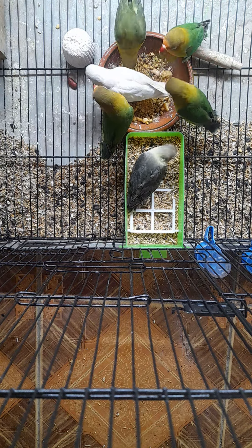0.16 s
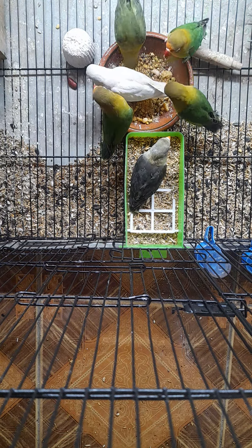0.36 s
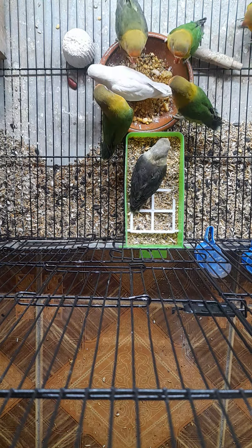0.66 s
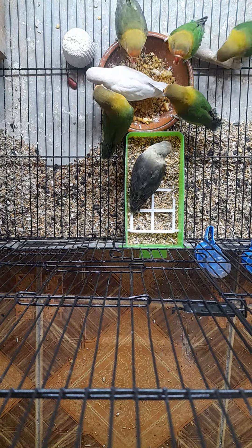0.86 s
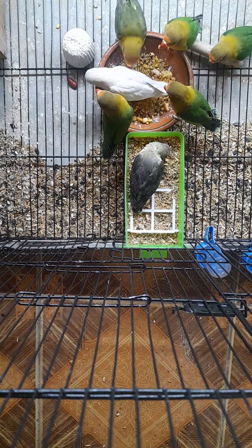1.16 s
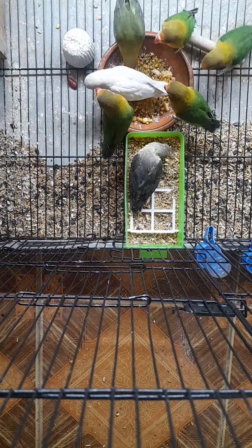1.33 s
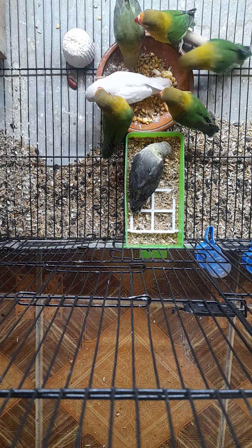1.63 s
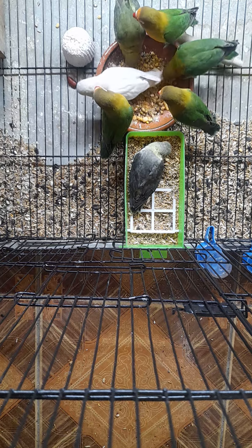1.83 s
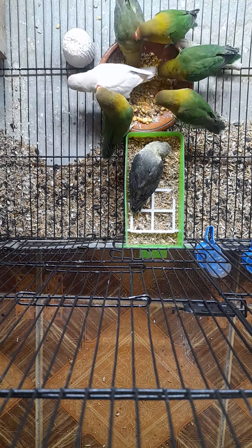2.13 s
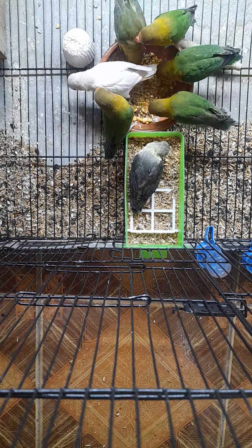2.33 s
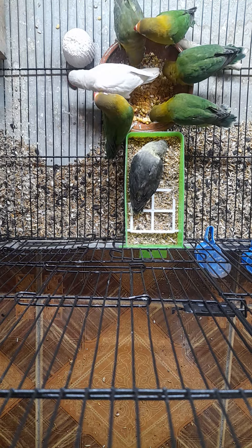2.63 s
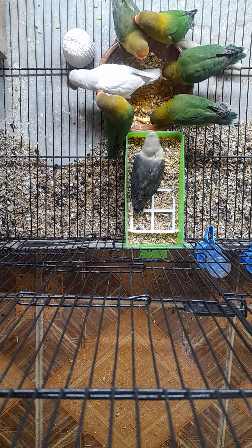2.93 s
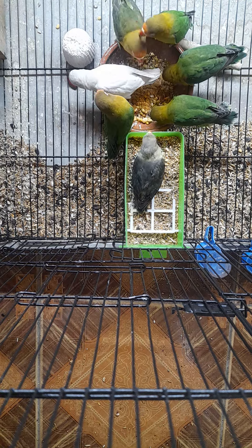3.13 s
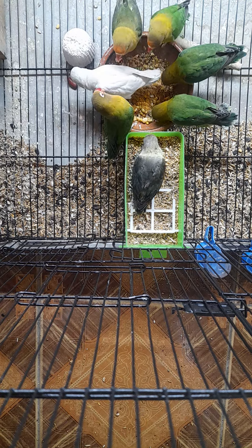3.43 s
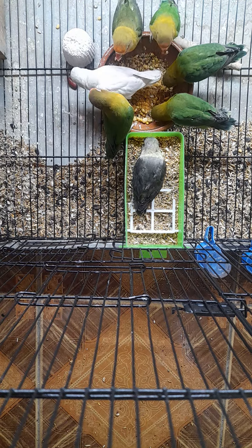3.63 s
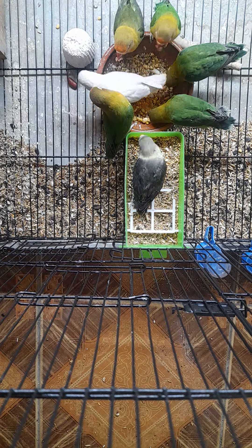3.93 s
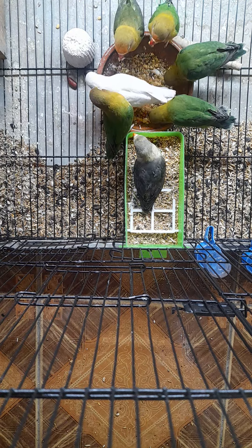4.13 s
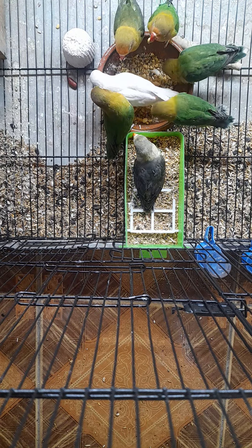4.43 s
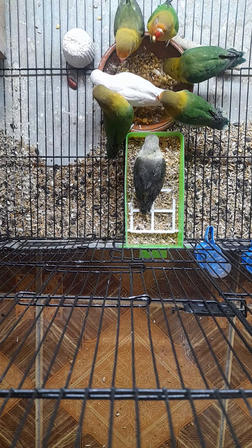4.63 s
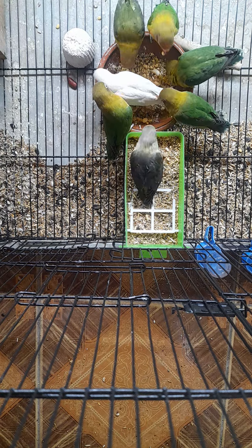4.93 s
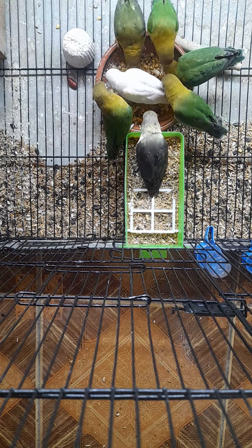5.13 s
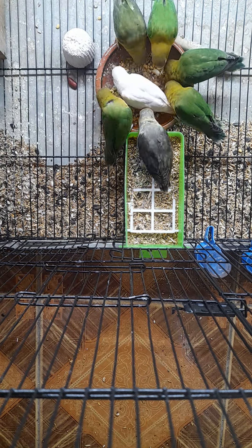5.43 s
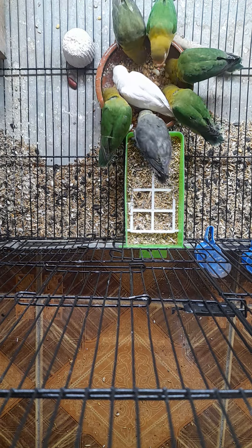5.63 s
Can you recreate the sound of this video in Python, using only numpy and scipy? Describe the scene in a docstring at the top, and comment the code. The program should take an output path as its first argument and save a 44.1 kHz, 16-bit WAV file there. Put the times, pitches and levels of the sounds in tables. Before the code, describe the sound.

Lovebirds at a seed dish in a cage. A clipped chirp opens, then a few grainy wing flicks with snaps. Sparse, softer peeps follow until a dense, loud volley of shrieks and whistled notes just before three seconds. Quiet chirps and warbles come next, then another raspy cluster near the end. Hard, reverberant room with low hum and airy rush; stereo microphone, birds to the right.

```python
"""A wire cage in a hard-walled room: lovebirds crowd round a seed dish, towards the right.
Shrieks, notes and warbles are gliding harmonic tones, throbbed and jittered into a rasp.
Wing flicks are grainy noise strokes with snaps among them; seed pecks and husk cracks are noise clicks.
Behind: a motor hum of steady lines, a rush of air, soft bumps, and at first a faint wavering far whistle."""
import sys
import numpy as np
from scipy import signal
from scipy.fft import rfft, irfft, next_fast_len
from scipy.io import wavfile
from scipy.ndimage import map_coordinates

SR = 44100
rng = np.random.default_rng(int(sys.argv[2]) if len(sys.argv) > 2 else 0)


def dump_mix(stems):
    """Bounce the given channels to the path in sys.argv[1] as a 16-bit WAV at rate SR."""
    frames = np.atleast_2d(stems).T  # one column per channel
    limited = np.clip(frames, -1, 1)  # hard clip at full scale
    pcm = np.round(limited * 32767).astype(np.int16)
    wavfile.write(sys.argv[1], SR, pcm)


N = 254456
TIME = np.arange(N) / SR   # s
PROGRESS = np.linspace(0, 1, 60)   # course of one syllable


def from_db(db):
    """Decibels to gain."""
    return 10 ** (np.asarray(db) / 20)


def rms_one(x):
    """Scale to rms 1."""
    return x / np.sqrt(np.mean(x ** 2) + 1e-20)


def at_hz(points, hz):
    """Interpolate (Hz, value) points on a log-frequency axis."""
    known_hz, values = np.transpose(points)
    return np.interp(np.log(np.maximum(hz, 1)), np.log(known_hz), values)


def colour(x, spectrum):
    """Filter by a smooth (Hz, dB) curve."""
    n = x.shape[-1]
    size = next_fast_len(n + 512)
    gain = from_db(at_hz(spectrum, np.fft.rfftfreq(size, 1 / SR)))
    return irfft(rfft(x, size) * gain, size)[..., :n]


def band(x, low_hz, high_hz):
    """Butterworth band-pass."""
    edges_hz = [low_hz, min(high_hz, SR / 2 - 100)]
    return signal.sosfilt(signal.butter(2, edges_hz, "band", fs=SR, output="sos"), x)


def high_pass(x, cutoff_hz):
    """Butterworth high-pass."""
    return signal.sosfilt(signal.butter(2, cutoff_hz, "high", fs=SR, output="sos"), x)


def drift(rate_hz, size):
    """Smooth random motion of spread about 1: a cubic spline through random knots."""
    knots_per_s = 2 * rate_hz
    knots = rng.standard_normal(int(size / SR * knots_per_s) + 6)
    return map_coordinates(knots, [2 + np.arange(size) / SR * knots_per_s], order=3)


def arch(start_s, length_s):
    """Half-sine swell."""
    return np.sin(np.pi * np.clip((TIME - start_s) / length_s, 0, 1))


def add(track, start_s, sound):
    """Mix a sound into a track."""
    start = max(round(start_s * SR), 0)
    part = sound[:max(N - start, 0)]
    track[start:start + len(part)] += part


def syllable(contour, overtone_db, step_db, throb_db=3.5, throb_hz=145, swing=0.12):
    """The syrinx whistles a gliding tone; when forced, it throbs unevenly and shakes into a rasp."""
    edge_s, bloom_s = 0.003, 0.003
    jitter, jitter_hz = 0.06, 500   # jitter, swing: log-pitch depth at full rasp
    hiss_db, hiss_low_hz, hiss_high_hz = -13, 2400, 6500
    knot_s, knot_hz, knot_db, knot_rasp = np.transpose(contour)
    t = np.arange(knot_s[0], knot_s[-1] + edge_s, 1 / SR)
    rasp = np.clip(np.interp(t, knot_s, knot_rasp), 0.03, 1)

    # pitch sweeps down through each burst of strength
    throb = 2 * np.pi * throb_hz * t + drift(throb_hz / 3, len(t))
    shake = -swing * np.sin(throb) + jitter * drift(jitter_hz, len(t))
    pitch_hz = np.interp(t, knot_s, knot_hz) * np.exp(rasp * shake)
    bursts = rms_one(from_db(throb_db * np.sqrt(rasp) * np.cos(throb)))
    strength = bursts * from_db(np.interp(t, knot_s, knot_db))

    # harmonics build up just after the onset; those above Nyquist are muted
    phase = 2 * np.pi * np.cumsum(pitch_hz) / SR
    tone = np.sin(phase)
    bloom = 1 - np.exp(-(t - t[0]) / bloom_s)
    for k in range(2, 8):
        gain = from_db(overtone_db + min(step_db, -1) * (k - 2.5))
        tone += bloom * gain * np.sin(k * phase) * (k * pitch_hz < SR / 2)

    # forced air tears into hiss that fills the gaps between harmonics
    hiss = rms_one(band(rng.standard_normal(len(t)), hiss_low_hz, hiss_high_hz))
    tone += from_db(hiss_db) * rasp * hiss
    edges = np.clip(np.minimum(t - t[0], t[-1] - t) / edge_s, 0, 1)
    return np.sqrt(2) * tone * strength * edges


def gesture(length_s, pitch_hz, level_db, rasp):
    """Course of one syllable as rows of (s, pitch Hz, level dB, rasp 0-1)."""
    return np.column_stack(np.broadcast_arrays(length_s * PROGRESS, pitch_hz, level_db, rasp))


def shriek(length_s, foot_hz, top_hz, level_db, rasp, overtone_db, step_db, point):
    """Pitch scoops in, then rises and falls with effort; deep throbs chop it into quick down-strokes."""
    skew = 0.98   # under 1: top comes before the middle
    scoop, scoop_s = 0.2526, 0.0023   # starting shortfall as a share of pitch, catch-up time
    tire_db = 8   # lost from start to end
    effort = np.abs(np.sin(np.pi * PROGRESS ** skew)) ** point
    scooped = 1 - scoop * np.exp(-length_s * PROGRESS / scoop_s)
    pitch_hz = (foot_hz + (top_hz - foot_hz) * effort) * scooped
    db = level_db - tire_db * (PROGRESS - 0.5)
    contour = gesture(length_s, pitch_hz, db, rasp)
    return syllable(contour, overtone_db, step_db, throb_db=7, throb_hz=150.9, swing=0.19)


def note(length_s, start_hz, end_hz, level_db, rasp, overtone_db, step_db):
    """A peep that starts rough, then clears and sags as it glides evenly."""
    sag_db = 4   # lost from start to end
    swell_db, swell_s = 2, 0.0047   # quieter start, recovery time
    clearing_nepers = 0.7   # rasp decay over the note
    pitch_hz = start_hz + (end_hz - start_hz) * PROGRESS
    db = level_db - sag_db * PROGRESS - swell_db * np.exp(-length_s * PROGRESS / swell_s)
    clearing_rasp = rasp * np.exp(clearing_nepers * (0.5 - PROGRESS))
    return syllable(gesture(length_s, pitch_hz, db, clearing_rasp), overtone_db, step_db)


def stroke(length_s, held_hz, level_db, offset, plunge_s):
    """A nearly pure tone that slides onto its pitch, hangs, then plunges and rests on a low foot."""
    foot_hz, foot_db, rest_s = 1590, 1, 0.004   # foot_db: gain on the foot
    settle_s, rasp = 0.0038, 0.2
    t = length_s * PROGRESS
    fall = np.clip(1 + (t - length_s + rest_s) / plunge_s, 0, 1)
    slide = 1 + offset * np.exp(-t / settle_s)
    pitch_hz = (held_hz + (foot_hz - held_hz) * fall) * slide
    contour = gesture(length_s, pitch_hz, level_db + foot_db * fall, rasp)
    return syllable(contour, overtone_db=-21, step_db=-2)


def calls(call, table):
    """Every row of a table, sung at its time."""
    out = np.zeros(N)
    for start_s, *row in table:
        add(out, start_s, call(*row))
    return out


def birds():
    """All shrieks and notes, coloured by throat and beak."""
    # overtone_db: harmonic level extrapolated to order 2.5
    # step_db: per further harmonic, held to -1 or less
    # arching shrieks: start_s, length_s, foot_hz, top_hz, level_db (midway), rasp (0-1),
    # overtone_db, step_db, point (exponent: under 1 flat-topped, over 1 pointed)
    shriek_rows = [(0, 0.0079, 4460, 6430, -15.5, 0.3, -27, -23, 0.7),
                   (2.681, 0.073, 3900, 5780, -11, 0.52, -13.5, -1, 1.84),
                   (2.98, 0.025, 4380, 7290, -16, 0.18, -8, -1.5, 1.03),
                   (3.066, 0.052, 4050, 5580, -19, 0.64, -16, -7.5, 0.72),
                   (3.131, 0.037, 3510, 5560, -16.5, 0.67, -15, -1.5, 1.1),
                   (5.201, 0.021, 4120, 6180, -14, 0.31, -21.5, -19, 0.71),
                   (5.273, 0.021, 3640, 5360, -13, 0.26, -18, -10, 0.48),
                   (5.638, 0.03, 5430, 6195, -13.5, 0.2, -22, -19, 0.86)]
    # gliding notes: start_s, length_s, start_hz, end_hz, level_db (before swell and sag),
    # rasp (0-1, midway), overtone_db, step_db
    note_rows = [(0, 0.024, 3895, 3897, -11.5, 1, -16, -1),
                 (0.024, 0.013, 4050, 3804, -10.5, 0.07, -13, -1),
                 (0.035, 0.0089, 3800, 2920, -19.5, 0.55, 0, -4.5),
                 (0.045, 0.0098, 3890, 4004, -10.5, 0.13, -6.5, -1),
                 (1.214, 0.0628, 3582, 3490, -25.5, 0.48, -4, -8),
                 (1.249, 0.046, 5800, 4794, -22.5, 0.79, -7.5, -1),
                 (1.299, 0.046, 4667, 4450, -20.5, 0.35, -9, -7.5),
                 (2.058, 0.012, 2210, 2325, -34.5, 0.84, -5.5, -1.5),
                 (2.137, 0.034, 2687, 2448, -28, 0.78, -2.5, -3.5),
                 (2.155, 0.032, 5036, 4845, -23, 0.47, -5, -0.5),
                 (2.497, 0.013, 2030, 1968, -25, 0.47, -1.5, -1),
                 (2.503, 0.0086, 4990, 6190, -15.5, 0.6, -21, -3),
                 (2.513, 0.029, 6230, 6600, -20.5, 0.2, -10.5, 1),
                 (2.666, 0.02, 2616, 2664, -20.5, 0.8, -1, -1),
                 (2.77, 0.015, 4370, 2680, -16.5, 0.53, -22, 3),
                 (2.787, 0.03, 2190, 2313, -27, 0.08, -2, -1),
                 (2.793, 0.035, 3530, 4135, -16.5, 0.18, -12, -1),
                 (2.824, 0.019, 4230, 4186, -4.5, 0.03, -15, -1),
                 (2.939, 0.027, 2330, 2674, -27, 0.45, 1.5, -4.5),
                 (2.959, 0.0088, 2550, 2904, -14, 0, -2.5, -4), (2.972, 0.0084, 3326, 4500, -6, 0, -6.5, 4),
                 (3.007, 0.014, 3585, 2420, -16.5, 0.6, -14, -1),
                 (3.033, 0.015, 3738, 3926, -6, .08, -15, 0), (3.047, 0.013, 3034, 3153, -12, 0.14, -7, -4),
                 (3.06, 0.013, 4170, 4360, -4.5, 0.25, -19, 3),
                 (3.678, 0.037, 3266, 3400, -38.5, 0.43, -17, -1),
                 (3.782, 0.043, 2070, 1950, -41, 0.35, -21, -1.5),
                 (3.882, 0.025, 2422, 2512, -47.5, 0.22, -3, -5.5),
                 (4.564, 0.04, 2031, 1985, -34.5, 0.42, -9.5, -3.5),
                 (4.604, 0.019, 2390, 2747, -33, 0.98, -2, -5),
                 (4.631, 0.03, 3236, 2956, -36.5, 0.76, -6.5, -6),
                 (4.921, 0.04, 3510, 3080, -35.5, 0.53, -22, 0),
                 (5.183, 0.014, 3090, 2262, -22.5, 1, -1.5, -5.5),
                 (5.225, 0.027, 3118, 3167, -18, 0.39, -1, -8),
                 (5.259, 0.017, 3617, 3683, -13.5, 0.6, -8, -7),
                 (5.383, 0.025, 2280, 2367, -23.5, 0, -8, 2), (5.405, 0.04, 2395, 2700, -29.5, 0.42, 2, 12),
                 (5.446, 0.032, 2730, 2880, -23.5, 0.17, -8, -1),
                 (5.477, 0.021, 4360, 4364, -22.5, 0.09, -2, 14),
                 (5.498, 0.039, 3735, 3595, -25, 0.8, -11.5, -5),
                 (5.611, 0.017, 3790, 4510, -21, 0.8, -15, -10),
                 (5.623, 0.025, 4515, 4826, -8, 0.09, -27, -3)]
    # throat and beak response: freq_hz, gain_db
    beak = [(1500, -7.5), (2200, -4.5), (6300, -5.5), (7900, -4.5), (8900, -10.5), (10000, 1.5),
            (11000, -5.5), (12700, -3), (15000, -18.5)]
    return colour(calls(shriek, shriek_rows) + calls(note, note_rows), beak)


def warbles():
    """Runs of strokes that slide onto a pitch, hold it, then plunge."""
    # strokes: start_s, length_s, held_hz, level_db (before the foot),
    # offset (at the start, share of pitch), plunge_s
    stroke_rows = [(1.569, 0.019, 2750, -33, 0.16, 0.0014), (1.588, 0.04, 3500, -31, -0.0018, 0.013),
                   (1.636, 0.036, 2840, -31.5, -0.25, 0.009), (3.702, 0.041, 2640, -43.5, 0.63, 0.0034),
                   (3.766, 0.037, 2463, -44.5, 0.083, 0.0104), (4.884, 0.041, 2500, -41.5, 0.87, 0.003),
                   (4.95, 0.025, 2450, -32.5, 0.65, 0.0035)]
    return calls(stroke, stroke_rows)


def wings():
    """Feathers brush past each other in short, grainy strokes."""
    # wing flicks: start_s, level_db (arch peak), length_s
    flicks = [(0.178, -31, 0.048), (0.303, -29, 0.073), (0.415, -37, 0.032), (0.455, -33.5, 0.055),
              (1.898, -47.5, 0.017)]
    # feather noise spectrum: freq_hz, density_db (relative)
    feathers = [(710, -36), (1200, -30), (1330, -9.5), (3600, -2), (4220, -2), (7310, -1), (13400, -17.5),
                (15000, -24)]
    grain_db, grain_hz = 5.0, 130
    strokes = sum(from_db(db) * arch(start_s, length_s) for start_s, db, length_s in flicks)
    grain = from_db(grain_db * drift(grain_hz, N))
    return strokes * rms_one(colour(rng.standard_normal(N), feathers) * grain)


def clicks():
    """Decaying noise clicks: feather snaps, two beak pecks and many tiny cracks of seed husks."""
    # short clicks, feather snaps among the wing flicks, then two beak pecks:
    # start_s, level_db (onset, before band-pass)
    click_rows = [(0.1935, -25), (0.331, -23), (0.4696, -25), (0.852, -42.5), (1.9894, -37)]
    decay_s, low_hz, high_hz = 0.0023, 1200, 11000
    husk_db, husk_range_db, husk_count = -52, 10, 30
    out, t = np.zeros(N), TIME[:SR // 30]
    husks = [(u * N / SR, husk_db + husk_range_db * (v - 0.5)) for u, v in rng.random((husk_count, 2))]
    for start_s, db in click_rows + husks:
        add(out, start_s, from_db(db) * np.exp(-t / decay_s) * rng.standard_normal(len(t)))
    return band(out + 1e-18, low_hz, high_hz)


def bumps():
    """Soft, dull knocks and rumbles of band noise, a little different in each ear."""
    # bumps: start_s, level_db (arch peak), length_s, centre_hz
    bump_rows = [(0.346, -44.5, 0.26, 342), (1.863, -42, 0.19, 330), (4.353, -46, 0.13, 58),
                 (4.547, -41, 0.0096, 800), (4.565, -52, 0.22, 61), (5.155, -40, 0.34, 81)]
    spread, apart = 2.28, 0.6   # band edge ratio to centre, independent noise per ear
    noise = rng.standard_normal(N) + apart * rng.standard_normal((2, N))
    return sum(from_db(db) * arch(start_s, length_s) * rms_one(band(noise, hz / spread, hz * spread))
               for start_s, db, length_s, hz in bump_rows)


def room(x, early_db=-1.5, tail_db=-0.5, gap_s=0.0043, thin_hz=1500):
    """Direct sound, floor and near-wall echoes, then a diffuse tail, thin in lows, shorter in treble."""
    # reverberation time: freq_hz, t60_s
    t60 = [(1500, 0.51), (5000, 0.41), (14000, 0.24)]
    early_decay_s, echoes_per_s = 0.018, 900
    t = TIME[:int(0.7 * SR)]
    edges_hz = np.geomspace(500, 20000, 8)
    white = rng.standard_normal((2, len(t)))
    tail = np.zeros((2, len(t)))
    for k, (low_hz, high_hz) in enumerate(zip(edges_hz, edges_hz[1:])):
        decay = from_db(-60 * t / at_hz(t60, np.sqrt(low_hz * high_hz)))
        tail += band(white, low_hz, high_hz) * decay * (-1) ** k
    tail *= t > gap_s
    hits = rng.random((2, len(t))) < echoes_per_s / SR
    early = rng.standard_normal((2, len(t))) * hits * np.exp(-t / early_decay_s) * (t > gap_s / 2)
    response = (from_db(tail_db) * rms_one(tail) + from_db(early_db) * rms_one(early)) / np.sqrt(len(t))
    response = high_pass(response, thin_hz)
    response[:, 0] += 1   # direct sound
    return signal.fftconvolve(x[None], response, axes=1)[:, :N]


def far_whistle():
    """A narrow tone, blurred by its long way through the room."""
    # whistle course: time_s, pitch_hz, level_db; silent after the last row
    course = [(0, 1246, -57), (.93, 1220, -55), (1.15, 1205, -60), (1.38, 1215, -47), (1.55, 1170, -59),
              (2.253, 1220, -60), (2.479, 1245, -48.5), (2.8, 1200, -58.5)]
    blur_hz = 22
    knot_s, knot_hz, knot_db = np.transpose(course)
    phase = 2 * np.pi * np.cumsum(np.interp(TIME, knot_s, knot_hz)) / SR
    blurred = [drift(blur_hz, N) * np.cos(phase) + drift(blur_hz, N) * np.sin(phase) for _ in range(2)]
    return np.array(blurred) * from_db(np.interp(TIME, knot_s, knot_db, right=-120))


def motor():
    """Steady hum lines that wander slightly in phase."""
    # hum lines: freq_hz, level_db (before background gain), lean_db (right minus left)
    lines = [(57.3, -63.5, 6), (75.5, -52.5, -0.5), (231.8, -62.5, -5.5), (254.5, -65, -3),
             (519.2, -59.5, -0.5), (634, -65, -6.5)]
    wander_rad, wander_hz = 0.11, 5.1
    out = np.zeros((2, N))
    for hz, db, lean_db in lines:
        gain = np.sqrt(2) * from_db(db + np.array([[-0.5], [0.5]]) * lean_db)
        out += gain * np.sin(2 * np.pi * hz * TIME + wander_rad * drift(wander_hz, N))
    return out


def air():
    """Room rush of coloured noise, alike in both ears in the bass only."""
    # rush spectrum: freq_hz, gain_db (relative)
    rush = [(18, -55), (30, -22.5), (81, -3), (110, -10), (300, -4.5), (400, -11.5), (524, -9),
            (1060, -19.5), (1200, -18), (1410, -22.5), (2130, -24.5), (5170, -30.5), (15000, -38.5)]
    # correlation between ears: freq_hz, likeness (0-1)
    likeness = [(80, 0.92), (200, 0.3), (4000, 0.027)]
    level_db = -49.0   # before background gain
    alike = np.clip(at_hz(likeness, np.fft.rfftfreq(N, 1 / SR)), 0, 1)
    mid, side = rfft(rng.standard_normal((2, N)))
    pair = irfft(np.sqrt(1 + alike) * mid + np.sqrt(1 - alike) * side * [[1], [-1]], N)
    return from_db(level_db) * rms_one(colour(pair, rush))


def scene():
    """The cage in its room over the background; left microphone shaded, right one lagging slightly."""
    # left microphone shaded from the cage: freq_hz, gain_db
    left_shade = [(1500, -11), (3000, -8), (4500, -11.5), (6500, -19), (8800, -31), (10700, -25.5),
                  (11600, -13.5), (13000, -10), (14200, -4)]
    # recorder gain on the background, a preset curve: sinks after loud shrieks, later recovers:
    # time_s, gain_db
    gain_points = [(0, 2.5), (1.15, 0.5), (1.5, 5), (2.66, 6.5), (2.76, 2.5), (3.4, -3.5), (4.2, -4.5),
                   (4.45, 4), (5.3, 6)]
    right_lag_s = 0.0003
    near = room(birds() + wings() + clicks())
    warbling = room(warbles(), early_db=-6, tail_db=0, gap_s=0.012, thin_hz=2400)
    left, right = near + warbling
    cage = np.array([colour(left, left_shade), np.roll(right, round(right_lag_s * SR))])
    background_gain = from_db(np.interp(TIME, *np.transpose(gain_points)))
    return cage + bumps() + far_whistle() + background_gain * (motor() + air())


def record(dry):
    """Full scale limits the peaks; the top is cut."""
    cutoff_hz = 15700
    low_pass = signal.ellip(10, 0.2, 80, cutoff_hz, fs=SR, output="sos")   # 0.2 dB ripple, 80 dB stop
    return signal.sosfilt(low_pass, np.clip(dry, -1, 1))


dry = scene()
out = record(dry)
dump_mix(out)
```